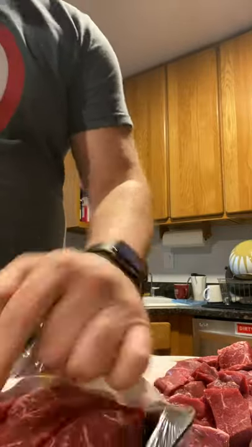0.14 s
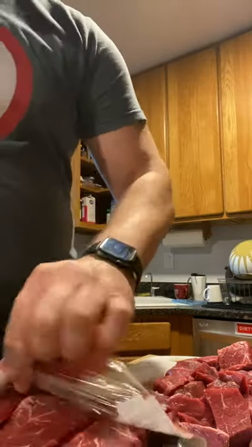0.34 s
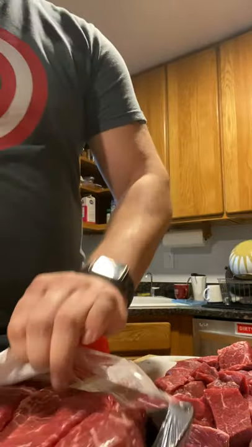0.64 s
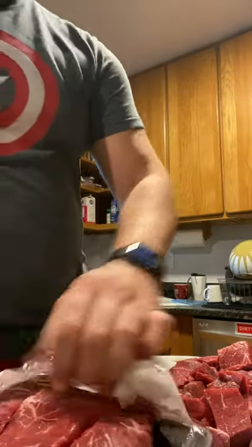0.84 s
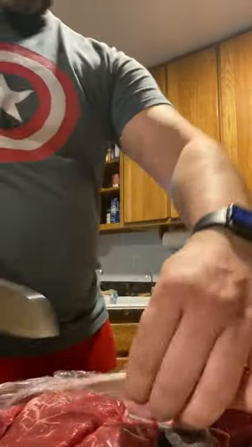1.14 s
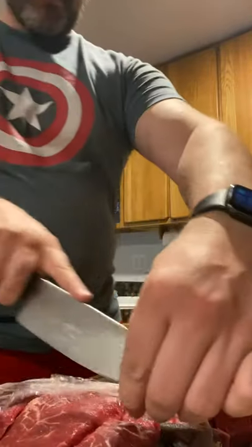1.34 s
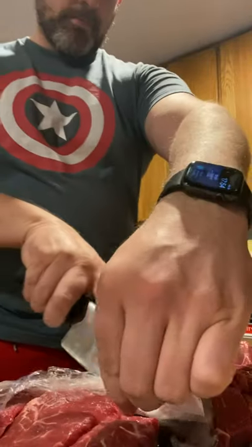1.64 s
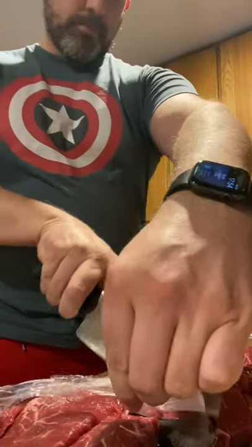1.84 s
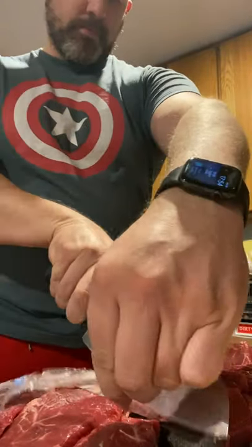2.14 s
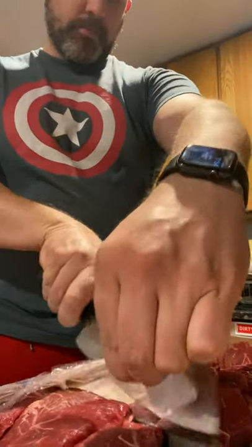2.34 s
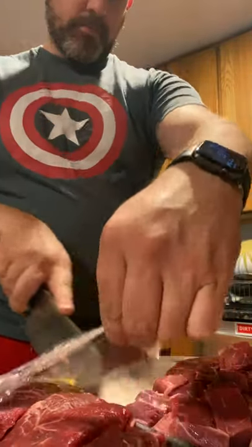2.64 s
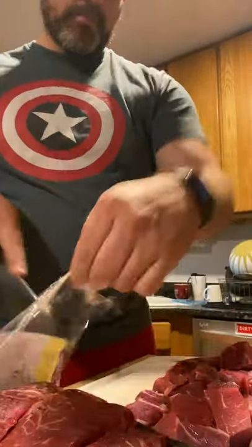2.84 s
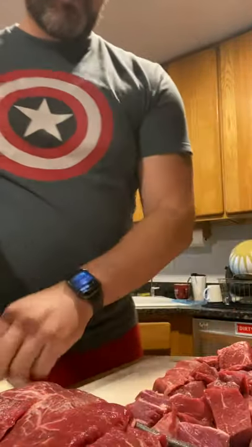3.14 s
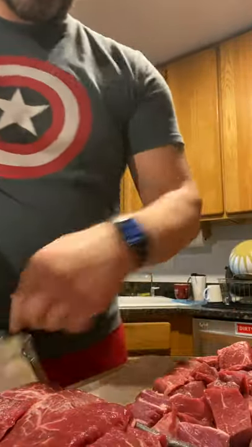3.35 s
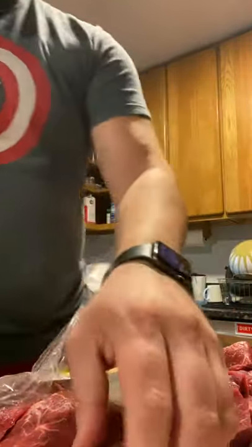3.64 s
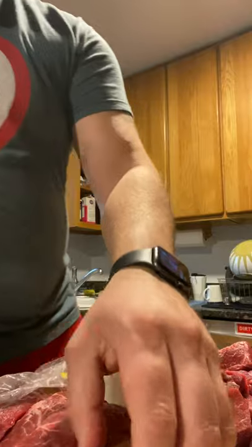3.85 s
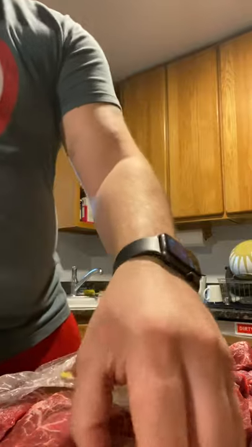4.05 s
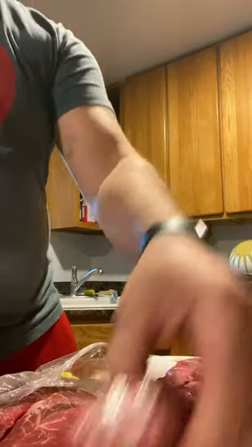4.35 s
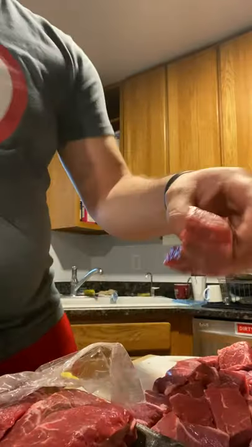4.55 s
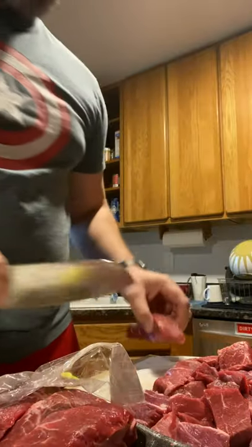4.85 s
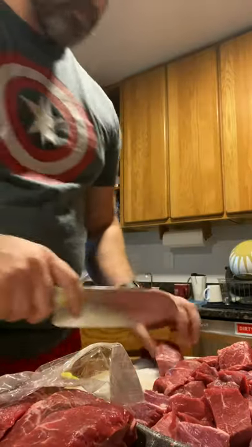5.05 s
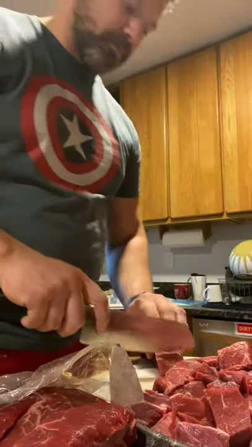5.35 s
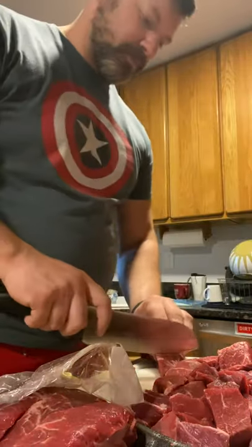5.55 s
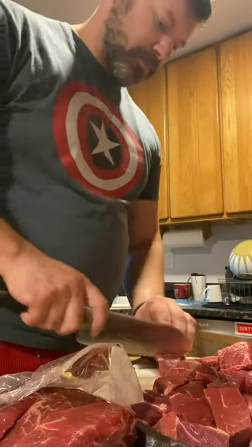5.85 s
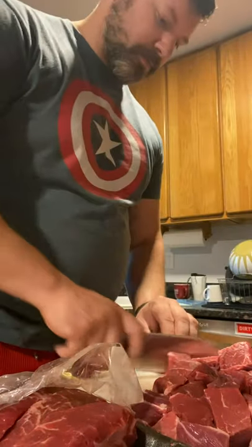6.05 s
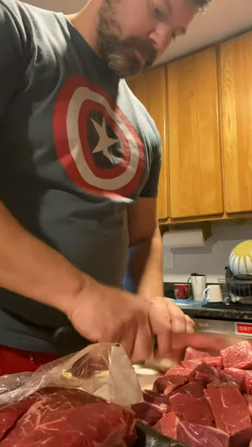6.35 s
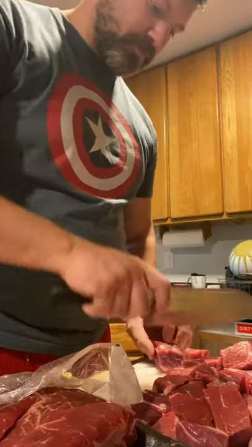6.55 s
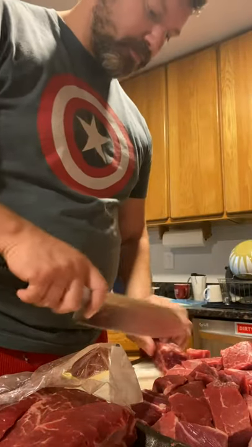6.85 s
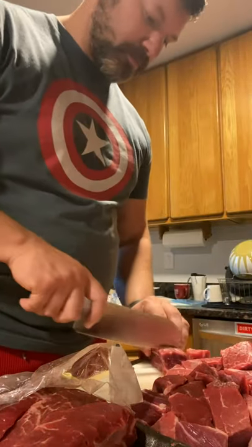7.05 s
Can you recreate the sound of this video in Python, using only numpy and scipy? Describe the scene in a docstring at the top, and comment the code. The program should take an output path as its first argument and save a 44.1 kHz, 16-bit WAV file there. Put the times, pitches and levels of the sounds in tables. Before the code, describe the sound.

In a small kitchen, a pot sizzles faintly and a fan hums throughout. Close to the microphone, hands rustle and snap plastic wrap around meat. A sharp, bright pop comes as a blade pierces the taut film, then a short smooth hiss of cutting and a dense, loud burst of crackling. After that it calms: a few rustles, soft low knocks on the board and faint wet slices.

```python
"""A pot sizzles and a fan hums throughout; over them hands tear plastic wrap off a tray of meat.
The wrap rustles and snaps, meat and blade knock the board, a knife slits the film, then slices meat.
Snaps, slaps and rustle are shaped noise; the board and the taut film are decaying modes.
The pot is spitting noise grains, the fan steady tones over coloured air noise.
Two microphone ports hear it all, with a short room tail on the hits."""
import sys
import numpy as np
from scipy import signal
from scipy.fft import rfft, irfft
from scipy.io import wavfile
from scipy.ndimage import uniform_filter1d

SR = 44100
rng = np.random.default_rng(int(sys.argv[2]) if len(sys.argv) > 2 else 0)


def wav_record(signal):
    """Record a signal, one row per channel, as 16-bit PCM in the file named by sys.argv[1]."""
    frames = np.transpose(np.atleast_2d(signal))
    bounded = np.clip(frames, -1, 1)
    # unit amplitude maps onto the largest positive 16-bit level
    quanta = np.round(bounded * 32767).astype(np.int16)
    wavfile.write(sys.argv[1], SR, quanta)


N = 317961  # samples

# Pot sizzle spectrum. Each row: frequency in Hz, gain in dB.
SIZZLE_COLOUR = [(700, -25), (1600, -14), (2150, 0), (2450, -4.5), (2800, 3), (3300, -6.5), (5500, -7),
                 (7400, -6), (7900, -12.5), (9500, -10.5), (12000, -12.5), (14400, -13), (15000, -22),
                 (16050, -55)]
# Fan air spectrum. Each row: frequency in Hz, gain in dB.
AIR_COLOUR = [(25, -0.5), (45, -1), (90, 0), (125, -8), (146, 13.5), (165, -5), (250, -0.5), (290, -5.5),
              (550, -8.5), (900, -19.5), (1800, -12.5), (4000, -58)]
# Steady tones of fan, fridge and mains; close pairs throb. Each row: frequency in Hz, mean level in dB rms.
HUM_TONES = [(49.1, -68), (98.3, -69), (119.8, -61), (127.9, -59), (219.4, -69), (239.8, -72), (255.7, -63),
             (383.5, -74), (391.5, -72)]
SIZZLE_DB, AIR_DB = -52.5, -55.5

# Steady rustle of hands on wrap and meat. Each row: time in seconds, rustle in dB, body in dB.
BUSY_LEVELS = [(0, -50.5, -45), (0.4, -49, -47.5), (0.8, -53, -48), (1.2, -52, -53.5), (1.55, -55.5, -63.5),
               (2.1, -53, -54), (2.3, -49.5, -51), (2.76, -43.5, -55), (2.78, -54.5, -46),
               (3.4, -55.5, -63), (4.22, -58, -61), (4.365, -48, -49), (4.395, -60.5, -61.5),
               (5.1, -54.5, -62), (7.21, -57.5, -62.5)]
BUSY_TREBLE_DB = -7  # relative to the rustle
# Tugs and scrapes, each a sudden rush of creases that dies away.
# Each row: start in seconds, peak gain in dB, fade in dB/s, treble in relative dB, body in relative dB.
TUGS = [(0.099, -46.5, 67, -1.5, 5), (0.508, -57, 77, 5.5, 11.5), (0.631, -42, 73, -2, -24),
        (0.958, -43.5, 159, -3.5, 6.5), (1.267, -43, 149, -7, -25), (2.131, -32.5, 119, -10, -9),
        (2.4, -28, 217, -6, -13), (2.479, -32, 150, 0, -17), (2.53, -46, 55, 7, -25),
        (2.636, -35, 130, -5, -16), (2.68, -44.5, 200, -16, -4.5), (2.712, -41, 308, -12, 4),
        (3.06, -49, 98, -7, -4), (3.31, -46, 200, -4, -28), (3.427, -50, 109, -1, 5.5),
        (3.913, -41.5, 450, -9, -16), (3.965, -52, 158, 1.5, -23), (4.158, -45, 242, -10, -10),
        (5.244, -42.5, 300, -25, -26), (6.148, -63.5, 70, -15, 15.5), (6.698, -43, 139, -11.5, 1)]
TUG_ATTACK_S = 0.006
# Middle of the handling noise. Each row: frequency in Hz, gain in dB.
RUSTLE_COLOUR = [(1100, -14.5), (1800, -7), (2300, 4.5), (3300, -0.5), (5000, -0.5), (7000, -9),
                 (8500, -21), (11000, -76)]
# Treble of the handling noise. Each row: frequency in Hz, gain in dB.
TREBLE_COLOUR = [(5000, -31), (7500, 8), (10000, 9), (13000, 10), (14400, 10.5), (15000, 3), (16050, -30)]
# Low body of the handling noise. Each row: frequency in Hz, gain in dB.
BODY_COLOUR = [(30, 13), (60, -0.5), (110, 5.5), (200, -4.5), (350, -9), (700, -15), (1300, -10.5),
               (2200, -19.5), (4000, -72)]
# Blade gliding through film, spectrum. Each row: frequency in Hz, gain in dB.
GLIDE_COLOUR = [(900, -32), (1500, -12.5), (2350, 4.5), (3300, -11), (4600, -6), (6000, -12), (9000, -13),
                (10500, -7), (12800, -10.5), (14400, -15), (14900, -40), (16050, -70)]
GLIDE_START_S, GLIDE_DB = 1.6134, -30.5
GLIDE_ATTACK_S, GLIDE_HOLD_S, GLIDE_FADE_DB_S = 0.059, 0.027, 287
# Blade strokes through the meat. Each row: start in seconds, level in dB, hold in seconds.
SLICES = [(5.846, -60, 0.057), (6.087, -51, .04)]
SLICE_HZ, SLICE_WIDTH_HZ, SLICE_ATTACK_S, SLICE_FADE_DB_S = 3870, 4100, 0.012, 300

# Small crinkles at random times while the wrap is pulled.
CRINKLE_SPAN_S, CRINKLE_COUNT = (0, 1.2), 22
CRINKLE_DB, CRINKLE_SPREAD_DB, CRINKLE_HZ, CRINKLE_TICK_DB = -42, 5, 1400, -13
# Wrap creases and wet meat snapping.
# Each row: start in seconds, burst peak in dB, fold pitch in Hz, tick in dB relative to the burst.
SNAPS = [(0.216, -26, 1530, -8), (0.308, -25, 2620, 5.5), (0.408, -19, 2130, 1), (0.413, -19.5, 2630, -12),
         (0.595, -24, 1420, -31), (0.639, -34, 840, 3), (0.763, -30.5, 584, -7), (0.823, -23.5, 840, -17),
         (0.83, -25, 1350, -11), (0.842, -31.5, 760, -8), (0.902, -40, 1190, -15), (0.952, -31.5, 816, -5),
         (0.977, -27, 2000, -6), (0.983, -29.5, 2320, -10), (1.017, -36, 1300, -15),
         (1.101, -36, 2300, -15), (1.142, -32.5, 1210, -16), (1.633, -39, 1610, -6),
         (1.672, -27.5, 4000, -15), (1.868, -33.5, 443, -22), (1.999, -31.5, 1920, -21),
         (2.128, -7.5, 1740, 3), (2.152, -10.5, 2300, -9), (2.161, -10.5, 1350, -4),
         (2.179, -18.5, 2780, -20), (2.184, -17, 1640, -6), (2.214, -26, 1130, -22),
         (2.327, -27.5, 1460, -23), (2.4035, -16.5, 1540, 3.5), (2.419, -21, 3880, -27),
         (2.426, -26, 3900, -20), (2.477, -17.5, 2870, 1), (2.489, -19, 3900, -10), (2.493, -31, 3300, -12),
         (2.551, -21, 3070, -20), (2.639, -20, 3070, -14), (2.681, -21, 4000, 3), (2.713, -19.5, 2540, -2),
         (2.743, -29.5, 2060, 20.5), (2.749, -20.5, 1230, -8), (2.752, -24.5, 680, 10.5),
         (2.758, -24.5, 1280, -8), (2.799, -30, 3430, -50), (2.922, -34, 547, -31), (2.965, -32, 2420, 12),
         (3.045, -30.5, 980, -18), (3.079, -25.5, 1930, 1.5), (3.43, -30, 1220, -5), (4.299, -43, 895, -10),
         (4.377, -34.5, 1320, -1), (5.041, -39.5, 690, -25), (6.701, -33, 527, -1)]
FOLD_WIDTH = 0.9  # bandwidth of a fold's ring over its pitch

# Knocks on the board. Each row: start in seconds, ring peak in dB, slap in dB relative to the ring, favoured
# pitch in Hz (board modes nearer to it ring louder).
KNOCKS = [(0.269, -30, -12, 120), (0.532, -45, 6, 121), (0.615, -45, -17, 108), (2.799, -38.5, 1.5, 132),
          (3.44, -35, -29, 78.1), (3.546, -38, -24, 119), (5.033, -44.5, 5, 300), (5.084, -41, 5, 300),
          (5.129, -39, 0.5, 45.8), (6.136, -28.5, -7, 153), (6.159, -31, -20, 168)]
# Board modes before weighting by spot. Each row: frequency in Hz, level in dB, T60 in seconds.
BOARD_MODES = [(60, 7, 0.05), (144.5, 3.5, 0.041), (225, -7, 0.17), (338, 5, 0.03)]

# Blade tip popping through the taut film. Each row: start in seconds, ring peak in dB.
POPS = [(1.262, -3)]
# Taut film modes. Each row: frequency in Hz, level in dB, T60 in seconds.
FILM_MODES = [(2200, 2, .014), (2600, -4, .009), (4700, 6, .007), (750, -17, .014), (6100, 2, .006)]

ROOM_T60_S, ROOM_DB = 0.15, -10
# Likeness of diffuse sound at the two ports. Each row: frequency in Hz, correlation (no unit).
DIFFUSE_ALIKE = [(170, .97), (500, .8), (900, .35), (1500, .4), (2500, .7), (3700, .4), (5200, .83),
                 (8000, .8), (9700, .94), (12000, .78), (14500, .93)]
# Likeness of close sources at the two ports. Each row: frequency in Hz, correlation (no unit).
NEAR_ALIKE = [(1400, .95), (2500, .9), (4600, .5), (6000, .65), (7500, .93), (12000, .9)]
# Extra gain of the left port. Each row: frequency in Hz, gain in dB.
LEFT_GAIN = [(40, -4), (170, 3), (400, 7.5), (700, 8), (1300, 5), (2100, 1), (5000, 0.25)]
# Phase lead of the left port, apart from its lag. Each row: frequency in Hz, lead in radians.
LEFT_PHASE = [(600, 0), (1100, -.5), (1900, .1), (2900, -.3), (3500, 1.7), (4000, 2.4), (4500, -.2),
              (6200, .1), (9600, -.5), (14600, -.85)]
PORT_LAG_SAMPLES = 4
LOW_CUT_HZ, TOP_HZ = 44, 16550


def undb(db):
    """Amplitude of a level in dB."""
    return 10 ** (np.asarray(db) / 20)


def along(table, n):
    """A (Hz, value) table read at the bins of an n-point transform, on a log frequency axis."""
    hz, value = np.transpose(table)
    bin_hz = np.arange(n // 2 + 1) * SR / n
    return np.interp(np.log(bin_hz + 1), np.log(hz), value)


def colour(x, table):
    """Shapes a spectrum by a table of gains and scales the overall rms to 1."""
    y = irfft(rfft(x) * undb(along(table, x.shape[-1])), x.shape[-1])
    return y / np.sqrt(np.mean(y ** 2))


def ports(source, alike=DIFFUSE_ALIKE):
    """Left and right versions of a random sound, blended from two draws to correlate by band."""
    other, right = rfft(source()), rfft(source())
    share = along(alike, N)
    left = share * other + np.sqrt(1 - share ** 2) * right
    return np.array([irfft(left, N), irfft(other, N)])


def band(x, hz, width_hz):
    """A single two-pole resonance."""
    b, a = signal.iirpeak(min(hz, SR / 2.3), hz / width_hz, SR)
    return signal.lfilter(b, a, x)


def steep(x, hz, width_hz):
    """A resonance passed twice, for steeper skirts."""
    return band(band(x, hz, width_hz), hz, width_hz)


def walk(rate_hz):
    """Random levels, one per 1 / rate_hz s, smoothed twice; spread near 1."""
    hold = int(SR / rate_hz)
    steps = np.repeat(rng.standard_normal(N // hold + 1), hold)
    return 1.67 * uniform_filter1d(uniform_filter1d(steps, hold), hold)[:N]


def grains(rate_hz, spread_db, smear_s, hiss):
    """Random clicks of very uneven size, each a short decaying burst of noise, over an even hiss."""
    size_db = np.minimum(spread_db * rng.exponential(size=N), 5 * spread_db)
    clicks = (rng.random(N) < rate_hz / SR) * undb(size_db)
    fade = signal.lfilter([1], [1, -np.exp(-1 / (smear_s * SR))], clicks)
    return (fade / np.sqrt(np.mean(fade ** 2)) + hiss) * rng.standard_normal(N)


def curve(rows):
    """Gains over time from rows of dB; -120 dB outside."""
    s, *columns = np.transpose(rows)
    t = np.arange(N) / SR
    return [undb(np.interp(t, s, db, -120, -120)) for db in columns]


def swell(s, db, attack_s, hold_s, fade_db_s):
    """A gain that rises linearly, holds and fades exponentially."""
    t = np.arange(N) / SR - s
    fade_s = np.maximum(t - attack_s - hold_s, 0)
    return np.clip(t / attack_s, 0, 1) * undb(db - fade_db_s * fade_s)


def add(out, s, x, db):
    """Mixes a sound in at s with the given peak."""
    i = int(s * SR)
    out[i:i + len(x)] += (x * undb(db) / np.abs(x).max())[:len(out) - i]


def ring(modes, n):
    """Struck modes decay exponentially; each blow is a little detuned and has its own phases."""
    t = np.arange(n) / SR
    chance = rng.standard_normal((len(modes), 2))
    out = np.zeros(n)
    for (hz, db, t60_s), (detune, phase) in zip(modes, chance):
        tone = np.sin(2 * np.pi * hz * (1 + 0.01 * detune) * t + 2 * phase)
        out += undb(db) * tone * 1000 ** (-t / t60_s)
    return out


def kitchen():
    """Fat spits over the hiss of the pot; the fan's tones throb over its rush of air."""
    fat = ports(lambda: grains(250, 5.5, 0.001, hiss=3.5))
    pot = colour(fat, SIZZLE_COLOUR) * undb(SIZZLE_DB + 0.61 * walk(2.29))
    air = colour(ports(lambda: rng.standard_normal(N)), AIR_COLOUR)
    air = air * undb(AIR_DB + 1.5 * walk(3.4))
    turn = 2 * np.pi * np.arange(N) / SR
    hum = np.zeros(N)
    for hz, db in HUM_TONES:
        hum += undb(db + 1.5 * walk(6)) * np.sqrt(2) * np.sin(hz * turn)
    return pot + air + hum


def rustle(creases):
    """Dense tiny creases in middle, treble and body bands; steady handling and tugs add in power."""
    busy, low = curve(BUSY_LEVELS)
    power = np.array([busy, busy * undb(BUSY_TREBLE_DB), low]) ** 2
    for s, db, fade_db_s, treble_db, body_db in TUGS:
        tug = swell(s, db, TUG_ATTACK_S, 0, fade_db_s)
        power += np.outer(undb([0, treble_db, body_db]), tug) ** 2
    mid, treble, body = np.sqrt(power)
    out = mid * colour(creases, RUSTLE_COLOUR)
    out += treble * colour(creases, TREBLE_COLOUR)
    return out + body * colour(creases, BODY_COLOUR)


def slices(creases):
    """Blade strokes through wet fibres: the crease noise through a broad resonance, swelling and fading."""
    stroke = np.zeros(N)
    for s, db, hold_s in SLICES:
        stroke += swell(s, db, SLICE_ATTACK_S, hold_s, SLICE_FADE_DB_S)
    fibres = steep(creases, SLICE_HZ, SLICE_WIDTH_HZ)
    return stroke * fibres / fibres.std()


def blade_glide():
    """The blade's smooth hiss through the film: dense grains that swell in, hold and let go."""
    gain = swell(GLIDE_START_S, GLIDE_DB, GLIDE_ATTACK_S, GLIDE_HOLD_S, GLIDE_FADE_DB_S)
    gain = gain * undb(1.2 * walk(59.1))
    hiss = ports(lambda: grains(1100, 2.3, 0.0011, hiss=3.1), NEAR_ALIKE)
    return gain * colour(hiss, GLIDE_COLOUR)


def handling():
    """Creases of film and wet fibres feed rustle and slices; the gliding blade has its own hiss."""
    flutter = undb(2.1 * walk(40))  # folds give way in clusters
    creases = ports(lambda: grains(700, 3.6, 0.0015, hiss=0.85) * flutter, NEAR_ALIKE)
    return rustle(creases) + slices(creases) + blade_glide()


def crinkles():
    """Rows like the snaps, with time, level, pitch and tick drawn by chance."""
    start_s = rng.uniform(*CRINKLE_SPAN_S, CRINKLE_COUNT)
    size, pitch, tick = rng.standard_normal((CRINKLE_COUNT, 3)).T
    peak_db = CRINKLE_DB + CRINKLE_SPREAD_DB * size
    fold_hz = CRINKLE_HZ * 2 ** (0.7 * pitch)
    return list(zip(start_s, peak_db, fold_hz, CRINKLE_TICK_DB + 6 * tick))


def snaps(rows):
    """Each crease lets go in a burst that rings its fold, with a shorter bright tick at its front."""
    out, t = np.zeros(N), np.arange(1500) / SR
    for s, db, hz, tick_db in rows:
        noise = rng.standard_normal((2, len(t)))
        burst = noise[0] * t * np.exp(-t / 0.0011)
        fold = steep(burst, hz, FOLD_WIDTH * hz) + 0.51 * steep(burst, 900, 4100)
        add(out, s, fold, db)
        tick = steep(noise[1] * t * np.exp(-t / 0.00048), 8400, 11300)
        add(out, s, tick, db + tick_db)
    return out


def knocks():
    """Soft pushes ring the board, favouring modes near the spot's own tone; a wet slap comes first."""
    out, t = np.zeros(N), np.arange(6000) / SR
    for s, db, slap_db, spot_hz in KNOCKS:
        modes = []
        for hz, mode_db, t60_s in BOARD_MODES:
            octaves_off = abs(np.log2(hz / spot_hz))
            modes.append((hz, mode_db - 9 * octaves_off, t60_s))
        push = np.minimum(t / 0.004, 1)
        add(out, s + 0.0041, ring(modes, len(t)) * push, db)
        slap = band(rng.standard_normal(len(t)) * t * np.exp(-t / 0.0018), 750, 800)
        add(out, s, slap, db + slap_db)
    return out


def pop():
    """The taut film rings for a few cycles along with a bright tick."""
    out, t = np.zeros(N), np.arange(1500) / SR
    for s, db in POPS:
        onset = np.sin(np.pi / 2 * np.minimum(t / 0.0006, 1)) ** 2
        add(out, s, ring(FILM_MODES, len(t)) * onset, db)
        tick = band(rng.standard_normal(len(t)) * np.exp(-t / 0.0014), 10000, 9000)
        add(out, s, tick, db - 4)
    return out


def room(hits):
    """A short kitchen tail: hits convolved with decaying, band-limited noise."""
    t = np.arange(int(0.4 * SR)) / SR
    noise = ports(lambda: rng.standard_normal(N))[:, :len(t)]
    tail = noise * 1000 ** (-t / ROOM_T60_S) * np.minimum(t / 0.008, 1)
    tail = band(tail / np.sqrt(np.sum(tail[1] ** 2)), 2800, 4000)
    return undb(ROOM_DB) * signal.fftconvolve(hits, tail, axes=1)[:, :N]


def scene():
    """Hits get a short kitchen tail; handling and kitchen noise lie under them."""
    rows = SNAPS + crinkles()
    hits = ports(lambda: snaps(rows), NEAR_ALIKE) + knocks() + pop()
    return kitchen() + handling() + hits + room(hits)


def record(dry):
    """The left port is fuller in the low mids, lags and turns phase; both ports are band-limited."""
    lag = 2 * np.pi * PORT_LAG_SAMPLES * np.arange(N // 2 + 1) / N
    turn = along(LEFT_PHASE, N) - lag
    left = irfft(rfft(dry[0]) * undb(along(LEFT_GAIN, N)) * np.exp(1j * turn), N)
    low_cut = signal.butter(4, LOW_CUT_HZ, "high", fs=SR, output="sos")
    sound = signal.sosfilt(low_cut, np.array([left, dry[1]]))
    top_cut = signal.ellip(10, 0.2, 80, TOP_HZ, fs=SR, output="sos")
    return signal.sosfilt(top_cut, sound)


dry = scene()
out = record(dry)
wav_record(out)
```